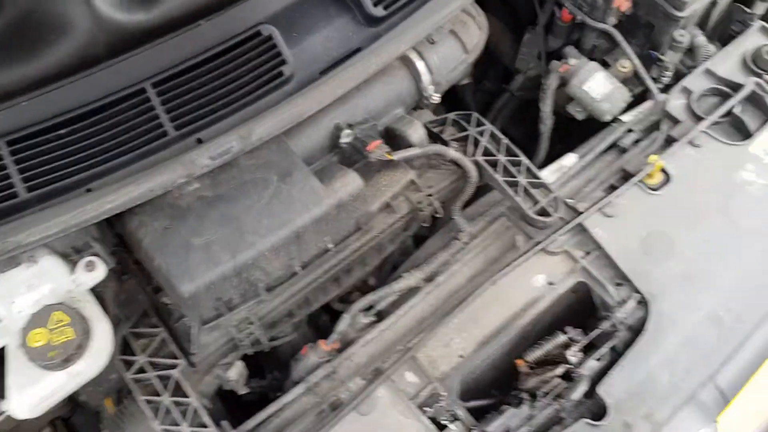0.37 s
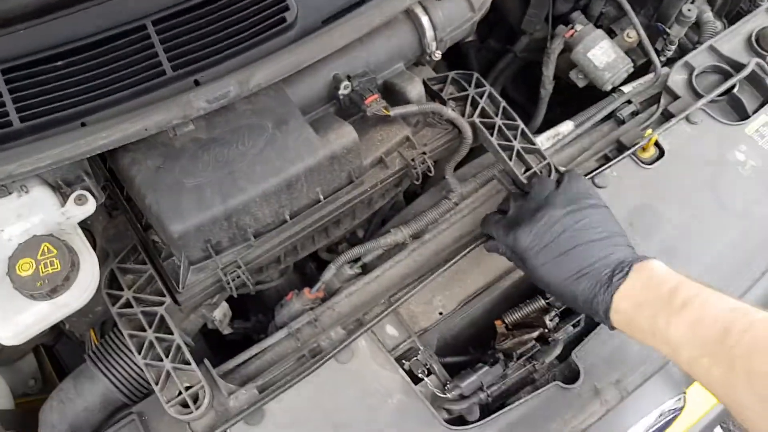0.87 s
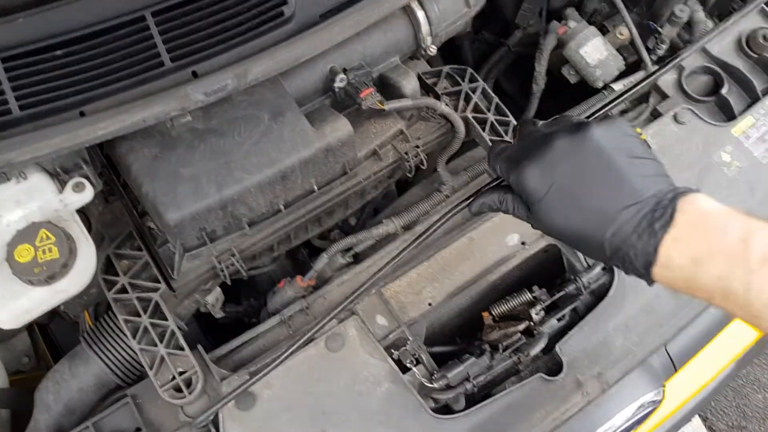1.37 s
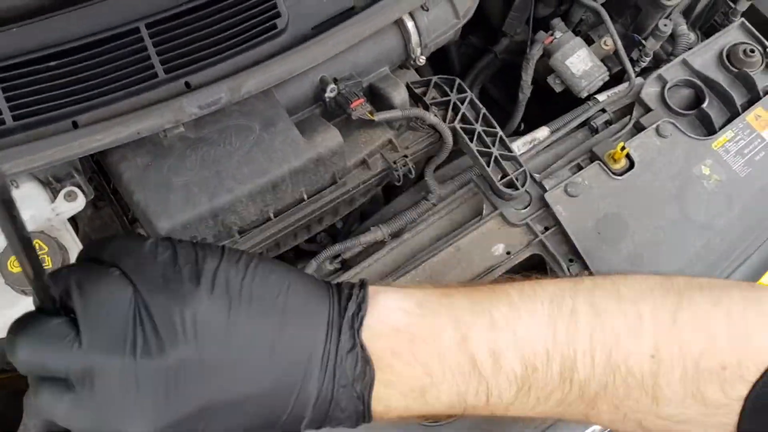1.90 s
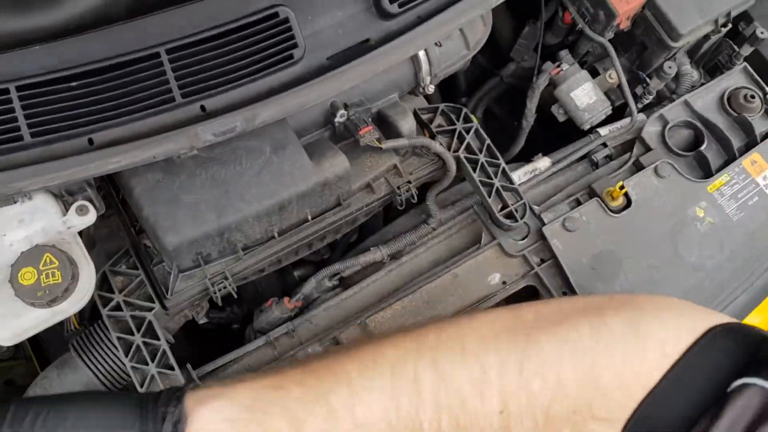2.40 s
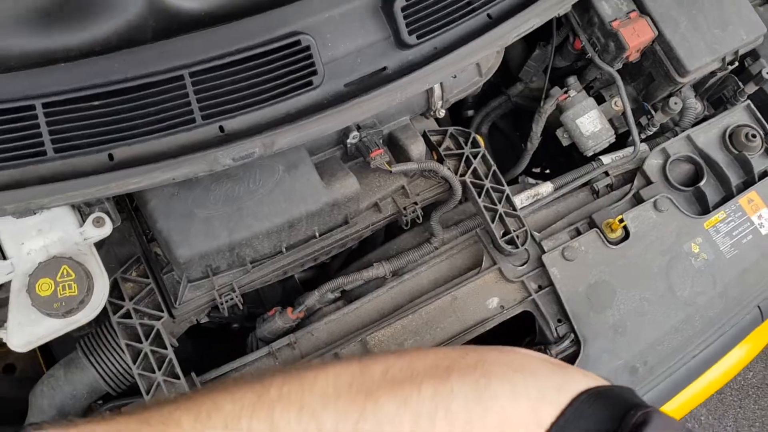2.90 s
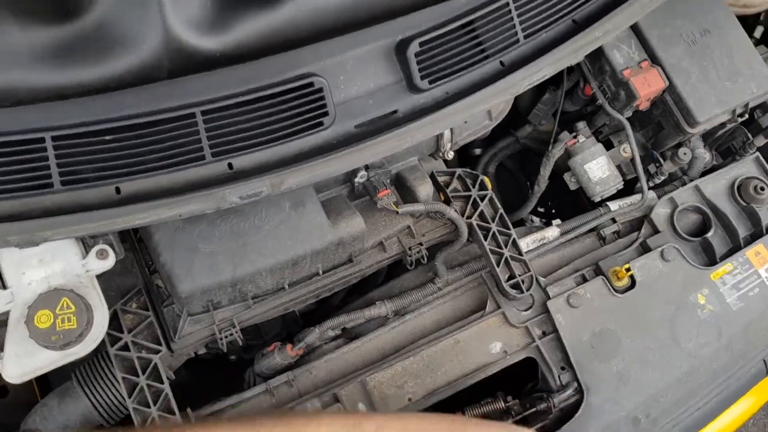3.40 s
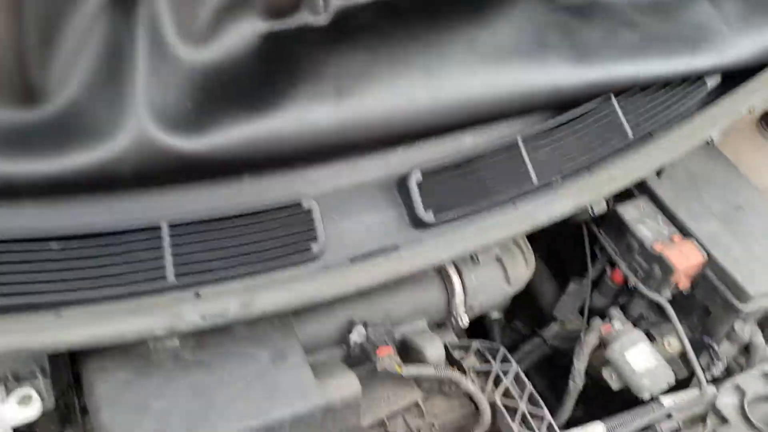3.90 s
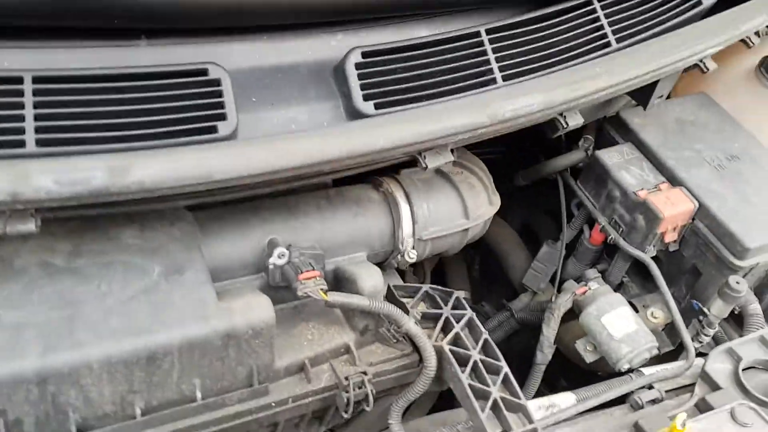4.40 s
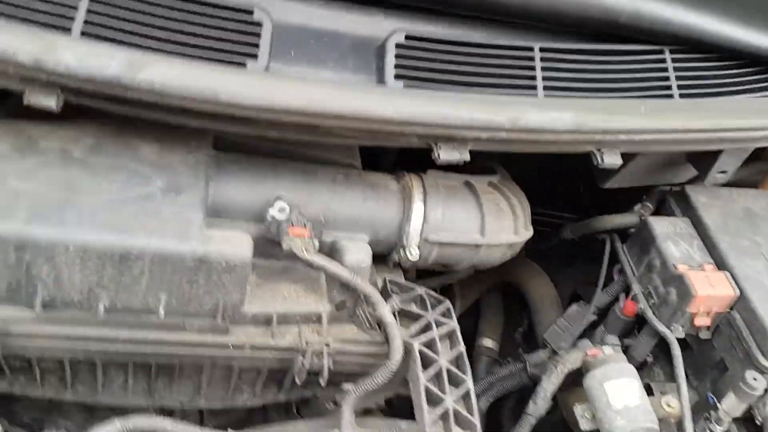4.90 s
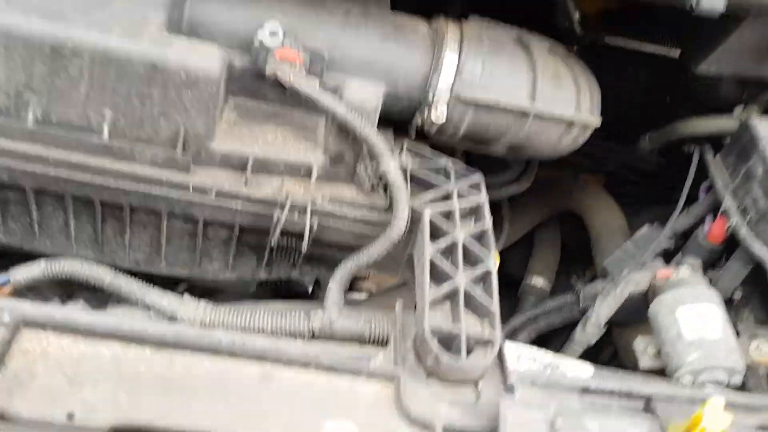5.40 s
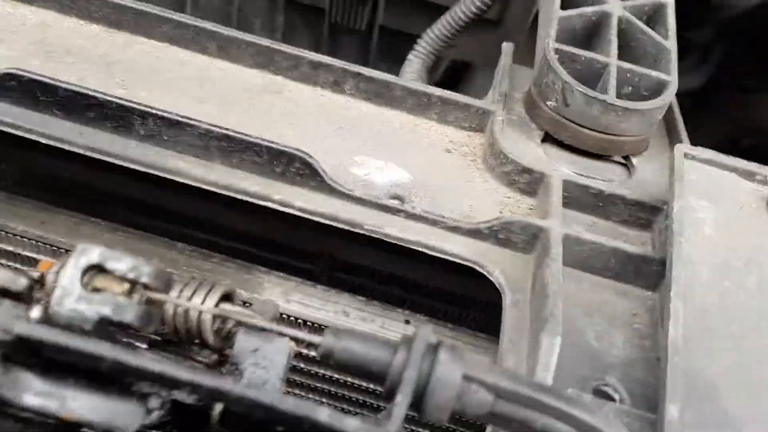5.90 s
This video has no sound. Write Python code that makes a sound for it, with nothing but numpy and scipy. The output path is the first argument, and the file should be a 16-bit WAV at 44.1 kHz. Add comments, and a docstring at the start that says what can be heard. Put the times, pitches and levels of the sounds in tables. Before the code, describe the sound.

Outdoors at an open car engine bay, a metal rod scrapes and snaps free, clatters into place, followed by cloth rustle and rattling little clinks.

```python
"""Outdoors at an open engine bay, over low traffic rumble and air hiss: gloves and cloth brush close by.
A steel prop rod is lifted: its dry pivot grates, it snaps out of its plastic clip and rings, swishes
through the air and knocks into the socket of the raised bonnet. Then clothing rustles, small hard parts
tick and rattle on the left and a buckle rings. Rod, panel and small parts are ringing resonators;
the panel's dense modes, ticks, cloth and air are shaped bands of noise."""
import sys
import numpy as np
from scipy import signal
from scipy.io import wavfile

SR = 44100
rng = np.random.default_rng(int(sys.argv[2]) if len(sys.argv) > 2 else 0)


def ratio(d):
    """dB to gain"""
    e = np.asarray(d, float) / 20
    return 10 ** e


def unload_wav(signal):
    """Save mono or channel-first audio to the path in sys.argv[1] as 16-bit WAV at rate SR, clipped to [-1, 1]."""
    wavfile.write(
        sys.argv[1],
        SR,
        np.round(np.clip(np.atleast_2d(signal).T, -1, 1) * 32767).astype(np.int16),
    )


N = 266055


def rms_one(x):
    """Scale to unit rms."""
    return x / np.sqrt(np.mean(x ** 2) + 1e-20)


def in_time(rows):
    """Draw the columns of a timed table as curves, sample by sample."""
    time_s, *columns = np.transpose(rows)
    return [np.interp(np.arange(N) / SR, time_s, column) for column in columns]


def at_hz(points, hz):
    """Read a table on a log-frequency axis."""
    table_hz, value = np.array(points).T
    return np.interp(np.log(hz), np.log(table_hz), value)


def sides(pan_db):
    """Left and right gains, pan_db apart (positive is left), whose mean is one."""
    gain = ratio(np.multiply.outer([0.5, -0.5], pan_db))
    return 2 * gain / gain.sum(axis=0)


def drift(rate_hz):
    """Random wander of unit rms: noise through a two-pole lowpass, computed at every 40th sample."""
    pole = np.exp(-2 * np.pi * rate_hz * 40 / SR)
    noise = rng.standard_normal(N // 40 + 2002)
    slow = signal.lfilter([1], [1, -2 * pole, pole * pole], noise)[2000:]
    return np.interp(np.arange(N) / 40, np.arange(len(slow)), rms_one(slow))


def clicks(start_s, sizes):
    """Stereo impulse train."""
    train = np.full((2, N), 1e-18)
    train[:, (np.asarray(start_s) * SR).astype(int)] = sizes
    return train


def dying(train, t60_s):
    """Each impulse falls away exponentially."""
    return signal.lfilter([1], [1, -ratio(-60 / (t60_s * SR))], train)


def ring(drive, hz, t60_s):
    """Resonator: a unit click sets off a dying sine that starts at height 1."""
    pole, angle = ratio(-60 / (t60_s * SR)), 2 * np.pi * hz / SR
    return signal.lfilter([0, np.sin(angle)], [1, -2 * pole * np.cos(angle), pole * pole], drive)


def bursts(start_s, sizes, t60_s):
    """Envelope: a sudden rise and an exponential fall of its own for each event."""
    out = np.zeros((2, N))
    for s, size, t60 in zip(start_s, sizes.T, t60_s):
        i = int(s * SR)
        fall = ratio(-60 * np.arange(int(1.5 * t60 * SR)) / (t60 * SR))
        out[:, i:i + len(fall)] += np.outer(size, fall)[:, :N - i]
    return out


# How alike left and right are: pitch_hz, likeness (1 = identical)
LIKENESS = [(60, 1), (1500, 0.057), (15000, 0.022)]


def noise_bands():
    """Half-octave bands of stereo noise, flat per Hz; the bass is alike left and right."""
    edges_hz = 25 * 2 ** np.arange(0, 9.6, 0.5)
    white = rng.standard_normal((2, 2, N))
    for k, (low, high) in enumerate(zip(edges_hz, edges_hz[1:])):
        band = signal.butter(2, [low, high], "band", fs=SR, output="sos")
        mid, side = signal.sosfilt(band, white[k % 2])   # neighbouring bands use different noise
        hz = np.sqrt(low * high)
        alike = np.clip(at_hz(LIKENESS, hz), 0, 1)
        yield hz, np.sqrt(1 + alike) * mid + np.sqrt(1 - alike) * side * [[1], [-1]]


# Modes of the free rod, some in close beating groups: pitch_hz
ROD_HZ = [2283, 3004, 3321, 4016, 4304, 5430, 7931, 7948, 8545, 9750, 11745, 12106, 12133, 12159, 13808]
# The same modes in the same order: relative level_db, t60_s
ROD_MODES = [(-43.5, .3), (-41.5, 0.39), (-35.5, 0.3), (-46.5, 0.3), (-44, 0.32), (-34.5, 0.22),
             (-28, 0.21), (-27.5, 0.24), (-27, 0.066), (-29.5, 0.15), (-31.5, 0.34), (-13.5, 0.15),
             (-14.5, 0.38), (-11, 0.23), (-25, .09)]
# Weaker modes of rod and bracket: pitch_hz
ROD_HAZE_HZ = [2627, 3575, 3709, 4624, 4753, 4926, 5308, 5986, 7000, 10120, 10950, 13350, 14700]
# Blows that set the rod ringing: start_s, relative level_db
ROD_BLOWS = [(1.733, 4.5), (2.25, -32), (5.72, -29.5)]


def rod():
    start_s, blow_db = np.transpose(ROD_BLOWS)
    modes = [(hz, db, t60) for hz, (db, t60) in zip(ROD_HZ, ROD_MODES)]
    for hz in ROD_HAZE_HZ:   # the higher, the stronger and shorter
        modes.append((hz, -47 + 6.5 * np.log2(hz / 4000), 0.23 * np.sqrt(4000 / hz)))
    rung = 0
    for hz, db, t60 in modes:
        waver = ratio(2.2 * np.stack([drift(23), drift(25)]))
        blows = clicks(start_s, ratio(blow_db + db + 0.5) * sides(7)[:, None])
        rung = rung + waver * ring(blows, hz, t60)
    grip = bursts(start_s, np.full((2, len(start_s)), 0.75), np.full(len(start_s), 0.2))
    left, right = (1 - np.clip(grip, 0, 1)) * rung
    return np.stack([left, np.roll(right, 1)])   # the rod reaches the right side one sample later still


# Rod and bracket resonances excited by the pivot: pitch_hz, width_hz, relative level_db
PIVOT = [(600, 280, -4.5), (1530, 120, -3.5), (2284, 400, -2.5), (2620, 620, -3), (6190, 700, -3.5),
         (8200, 1700, -12.5), (11900, 1900, -5.5), (13600, 9500, -8)]
# Loudness of the rod turning in its pivot: time_s, level_db
SWING = [(1.325, -80), (1.365, -44), (1.72, -41), (1.9, -49), (2.1, -61.5), (2.16, -45), (2.3, -64.5),
         (2.4, -52), (2.68, -53), (2.82, -81)]


def pivot():
    """Uneven stick-slip grains excite the rod and bracket, coming, going and wandering in pitch."""
    grains = rng.standard_normal((2, N)) * ratio(1.6 * drift(80))
    grains[1] = 0.5 * grains[0] + 0.97 * grains[1]
    rung = 0
    for hz, width_hz, db in PIVOT:
        t60_s = 2.2 / width_hz
        narrow = ring(ring(grains, hz, t60_s), hz, t60_s)   # twice, for steep skirts
        read = np.cumsum(1 + 0.013 * drift(10)) % (N - 1)   # uneven reading speed bends the pitch
        bent = np.stack([np.interp(read, np.arange(N), side) for side in narrow])
        rung = rung + ratio(db + 2.8 * drift(25)) * np.sqrt(width_hz) * rms_one(bent)
    return ratio(in_time(SWING)[0]) * rms_one(rung) * sides([6.0])


def swish():
    """A band of air noise swells and fades as the rod is swung."""
    peak_s, spread_s, level_db = 1.966, 0.06, -52.5
    band = signal.butter(2, (2900, 4500), "band", fs=SR, output="sos")
    air = rms_one(signal.sosfilt(band, rng.standard_normal((2, N))))
    return ratio(level_db) * np.exp(-0.5 * ((np.arange(N) / SR - peak_s) / spread_s) ** 2) * air


# relative level_db, edge_db (added treble, full from 5 kHz), pan_db (positive is left),
# favoured_hz, contact_s
KNOCKS = [(0.3698, -44.5, 10, -1, 1900, 0.0067), (0.7986, -39.5, -39, 2, 477, 0.037),
          (1.3085, -27.5, 6, 2, 255, 0.022), (1.7228, -7.5, 13.5, 6.5, 306, 0.037),
          (2.2443, -40, -4, 9.5, 580, 0.014), (2.8106, -14.5, 11, 9, 558, 0.021),
          (3.0704, -17.5, 11, 8.5, 800, 0.016), (3.1093, -11, 6, 8, 712, 0.0099),
          (3.152, -23, 2, 9.5, 720, 0.031), (3.2011, -8.5, 8.5, 8, 931, 0.024),
          (3.4215, -32, -58, 6.5, 600, 0.018), (4.814, -49, 18, 0, 520, 0.02)]


def knock_strength(hz):
    """Strength of every knock at one frequency: the struck spot favours nearby modes, edge sets the treble."""
    _, db, edge_db, pan_db, favoured_hz, _ = np.transpose(KNOCKS)
    favour_db = 5.5 * np.exp(-(np.log2(hz / favoured_hz) / 0.92) ** 2)   # 0.92 octaves wide
    treble_db = np.clip(np.log2(hz / 2500), 0, 1) * edge_db
    return ratio(db + favour_db + treble_db) * sides(pan_db)


def grinding(hz):
    """Contact force: a sharp first touch, then the parts grind together, the treble fading first."""
    out = np.zeros((2, N))
    for (start_s, *_, contact_s), size in zip(KNOCKS, knock_strength(hz).T):
        i, t = int(start_s * SR), np.arange(int(contact_s * SR)) / SR
        fade = (1 - 0.61 * t / contact_s) * np.exp(-t * hz / 160)
        touch = 1 + 1.3 * np.exp(-t / 0.001)
        out[:, i:i + len(t)] = np.outer(size, touch * fade) / np.sqrt(contact_s)
    return out


# Strongest panel modes: pitch_hz, relative level_db, t60_s
PANEL = [(119, -14.5, 0.32), (192, -11.5, 0.26), (255, -10, .14), (326.3, -9.5, 0.15), (503, -10, 0.17),
         (712, -3.5, 0.082), (952, -11, 0.15), (1124, -3.5, 0.11), (1365, -8, 0.071), (1619, -0.5, 0.051),
         (2342, -9.5, 0.026), (2772, -13, 0.044), (3145, -13.5, 0.053), (3420, -9.5, 0.062)]


def panel_modes():
    """First touch and rough contact drive the strongest modes; the two sides hear them a little differently."""
    out, touch = 0, clicks(np.transpose(KNOCKS)[0], 4.2)
    for hz, db, t60_s in PANEL:
        rough = touch + rng.standard_normal(N) + 0.5 * rng.standard_normal((2, N))
        out = out + ring(grinding(hz) * rough + 1e-18, hz, t60_s) * ratio(db - 50)
    return out


# Dense upper modes of the panel: pitch_hz, relative level_db per Hz
PANEL_WASH = [(40, -41), (110, -11.5), (700, -2), (1600, -4.5), (3000, -11), (8500, -30), (13000, -21.5),
              (16500, -28.5)]
# How fast they die: pitch_hz, t60_s
PANEL_DECAY = [(80, 0.78), (250, 0.27), (1470, .12), (10200, 0.029)]


def knock_wash(hz):
    """Envelope of the contact's own crack and of the panel's dense modes, dying treble first."""
    force = grinding(hz) ** 2
    modes = dying(force + 1e-18, at_hz(PANEL_DECAY, hz) / 2)   # power: half the time constant
    crack = ratio(48.5) * force
    return ratio(at_hz(PANEL_WASH, hz) - 44) * np.sqrt(modes + crack)


# A whole part gives under a push: start_s, relative level_db, pitch_hz
THUDS = [(0.8009, -40, 214), (1.3079, -29, 225), (1.727, -15, 275), (2.167, -33, 82.3), (2.247, -35.5, 146),
         (3.202, -38, 119), (4.905, -48, 450)]


def thuds():
    """The whole part gives under the soft push: low cycles swell and die, panned like the knocks."""
    out, start = np.zeros((2, N)), np.arange(SR // 2) == 0
    knock_s, _, _, knock_pan_db, _, _ = np.transpose(KNOCKS)
    for start_s, db, hz in THUDS:
        push = ring(start * ratio(db + 5), hz, 20.5 / hz)
        soft = ring(push, 1.47 * hz, 11 / hz) * hz / SR * 4   # a second, looser stage softens the start
        i = int(start_s * SR)
        out[:, i:i + len(soft)] += sides([np.interp(start_s, knock_s, knock_pan_db)]) * soft
    return out


# Small hard ticks of gloves, zips and plastic: start_s, relative level_db,
# brightness_db per octave, pan_db (positive is left), t60_s (held to 0.3 at most)
TICKS = [(3.384, -41.5, 7.5, 11, 0.044), (3.793, -43, -3, 16, 0.015), (4.1356, -50.5, 13, 34, 0.012),
         (4.3597, -37.5, 9, 5.5, 0.11), (4.5381, -47.5, 9, 7, 0.094), (4.72, -39, -2, 9.5, 0.047),
         (4.7672, -22.5, -2, 12, 0.21), (4.829, -31, 3, 4, 0.06), (4.893, -32, -4, 8, 0.032),
         (5.221, -8.5, -2, 12, 0.045), (5.237, -17.5, -4, 5.5, 0.27), (5.2815, -24.5, 5.5, 10, 0.06),
         (5.404, -24, 1.5, 5, 0.082), (5.611, -30, 0, 5, 0.051), (5.7189, -32.5, -4.5, 7, 0.34),
         (6.01, -31.5, -1, 5, 0.13)]
# Their common spectrum: pitch_hz, relative level_db per Hz
TICK_SPECTRUM = [(200, -29.5), (2300, -23.5), (3400, -6), (4900, -15.5), (7000, -9), (11000, -10),
                 (16500, -12.5)]


def tick_envelope(hz, chatter):
    """A sudden snap, then an uneven tail that dies at its own pace; brightness tilts about 4 kHz."""
    start_s, db, bright_db, pan_db, t60_s = np.transpose(TICKS)
    tilt_db = bright_db * np.log2(max(hz, 500) / 4000)
    size = ratio(db - 6.5 + tilt_db + at_hz(TICK_SPECTRUM, hz)) * sides(pan_db)
    tail = chatter * bursts(start_s, size, np.clip(t60_s, 0.004, 0.3))
    snap = bursts(start_s, size * ratio(11), np.full(len(start_s), 0.0035))   # 11 dB over the tail
    return tail + snap


def rattle(shake):
    """Loose small metal parts: uneven tiny contacts, each ringing briefly at one of twelve pitches."""
    contacts_per_s, level_db, t60_cycles = 600, -2, 60
    struck = rng.random(N) < contacts_per_s / SR
    hits = shake * ratio(level_db + 2.4 * rng.standard_normal(N)) * struck
    dealt = rng.integers(0, 12, N)   # which part each contact strikes
    out = 0
    for k, hz in enumerate(np.geomspace(3500, 13500, 12)):
        out = out + ring(hits * (dealt == k) + 1e-18, hz, t60_cycles / hz)
    return out


# Strokes of a small buckle: start_s, level_db
TINKS = [(5.721, -49), (5.776, -50)]


def buckle():
    """A small buckle rings at a single high pitch."""
    start_s, db = np.transpose(TINKS)
    return ring(clicks(start_s, ratio(db)), 10550, 0.13)


# Glove or sleeve brushes: start_s, hold_s, relative level_db, brightness_db per octave
BRUSHES = [(0., 0.013, -45, 2), (0.35, 0.026, -50, 0), (0.474, 0.016, -52, -1), (0.531, 0.0029, -49, 4.5),
           (0.8, 0.0072, -56, 8), (0.908, 0.0046, -49.5, -1), (2.19, 0.061, -51, 7),
           (3.52, 0.062, -59.5, 2.5), (4.813, 0.2, -58.5, 1), (5.268, 0.035, -47, 0.5)]
# Rising and falling rustle of clothing: time_s, relative level_db, brightness_db per octave
RUSTLE = [(0, -69.5, -0.5), (2.9, -68.5, -1), (3.5, -62.5, 0.5), (4., -74, 3), (4.27, -63.5, 2),
          (4.5, -76, 2.5), (4.75, -73, -0.5), (5.02, -65, 3), (5.18, -69, 0.5), (5.3, -51, 3),
          (5.5, -55.5, 2.5), (6.03, -52.5, 0)]


def cloth_motion():
    """Each brush swells, holds and fades over the moving rustle; the loudest sets the brightness."""
    rise_s, fall_s, ease = 0.032, 0.044, 0.25   # time per 20 dB, plus the ease share of the hold
    t, (rustle_db, bright_db) = np.arange(N) / SR, in_time(RUSTLE)
    power = ratio(2 * rustle_db)
    tinted = power * bright_db
    for start_s, hold_s, db, brush_bright_db in BRUSHES:
        early = np.maximum(start_s - t, 0) / (rise_s + ease * hold_s)
        late = np.maximum(t - start_s - hold_s, 0) / (fall_s + ease * hold_s)
        brush = ratio(2 * (db - 20 * np.minimum(early + late, 10)))
        power, tinted = power + brush, tinted + brush * brush_bright_db
    return 10 * np.log10(power) + 1.8 * drift(24), tinted / power


def fibres():
    """Fibres catch and let go: sparse random crackles, each dying fast, over a constant share."""
    caught = rng.random(N) < 60 / SR   # about 60 a second
    crackle = ratio(5.5 * np.minimum(rng.exponential(1, N), 3)) * caught
    return sides([5.0]) * (0.7 + 0.55 * dying(crackle, 0.008))


# Spectrum of rubbing cloth: pitch_hz, relative level_db per Hz
CLOTH = [(120, -24), (250, -2), (600, -3), (1500, -7), (3500, -8), (9000, -13), (12500, -13), (16500, -7)]


def cloth_envelope(hz, motion_db, bright_db, grain):
    """Friction noise in one band: movement sets its level, brightness tilts it about 6 kHz."""
    tilt_db = bright_db * np.log2(hz / 6000)
    return ratio(motion_db + at_hz(CLOTH, hz) + tilt_db + 13) * grain


# Loudness of the far traffic: time_s, level_db
RUMBLE = [(0, -41), (.4, -53), (.65, -56), (.85, -49), (1.1, -51.5), (1.5, -60), (2.8, -77), (4., -74.5),
          (5.5, -63), (6.03, -56)]


def rumble():
    """Far engines: narrow low noise, nearly alike on both sides."""
    noise = rng.standard_normal(N) + 0.3 * rng.standard_normal((2, N))
    low = ring(ring(noise, 56, 0.17), 90, 0.01)
    return ratio(in_time(RUMBLE)[0]) * rms_one(low) * sides([4.0])


# Spectrum of the open air: pitch_hz, relative level_db per Hz
AIR = [(25, -3.5), (70, 5), (349, -10.5), (979, -9.5), (2400, -35), (12600, -36), (15200, -28.5),
       (16500, -54)]


def air_envelope(hz):
    """Background air in one band, wandering a little in level."""
    return ratio(at_hz(AIR, hz) - 45 + 1.1 * drift(21)) * sides([5.0])


def scene():
    """Mix all sources; the right microphone is farther from the metalwork and hears it later."""
    motion_db, bright_db = cloth_motion()
    grain = fibres()
    chatter = ratio(1.5 * drift(140))   # unevenness of tails and contacts
    metal = panel_modes() + thuds() + rod() + pivot() + swish()
    out = rumble() + rattle(tick_envelope(7200, 0.94)) + buckle()   # the ticks shake the loose parts
    for hz, band in noise_bands():
        air = air_envelope(hz)
        cloth = cloth_envelope(hz, motion_db, bright_db, grain)
        out += band * np.sqrt(air ** 2 + cloth ** 2 + tick_envelope(hz, chatter) ** 2)
        metal += band * knock_wash(hz) * np.sqrt(chatter)
    # the metal sounds are thinned below about 65 Hz
    metal = signal.sosfilt(signal.butter(2, 65, "high", fs=SR, output="sos"), metal)
    return out + np.stack([metal[0], np.roll(metal[1], 18)])   # right lags by 18 samples


def low_pass(x):
    """Removes everything above the highest recorded frequency."""
    return signal.sosfilt(signal.butter(12, 17010, fs=SR, output="sos"), x)


def record(dry):
    """The top is cut, small capsules lose the deepest bass, and the highest peaks clip."""
    x = signal.sosfilt(signal.cheby2(10, 45, 16600, fs=SR, output="sos"), dry)
    x = signal.sosfilt(signal.butter(2, 35, "high", fs=SR, output="sos"), x)
    return low_pass(np.clip(x, -1, 1))


dry = scene()
out = record(dry)
unload_wav(out)
```